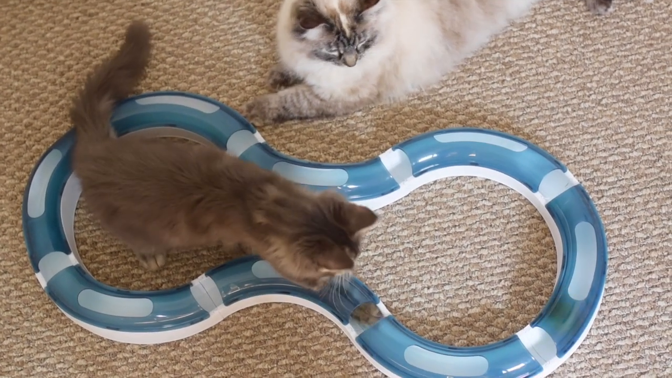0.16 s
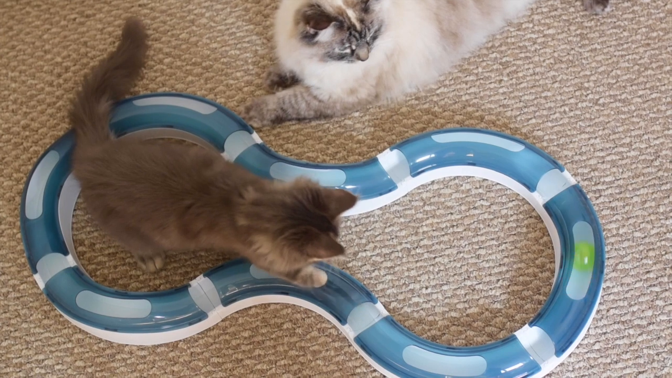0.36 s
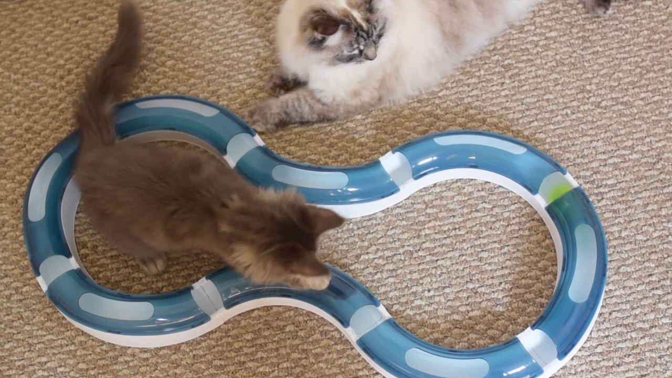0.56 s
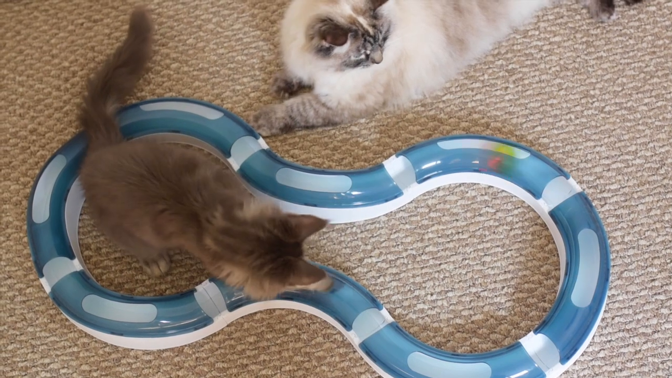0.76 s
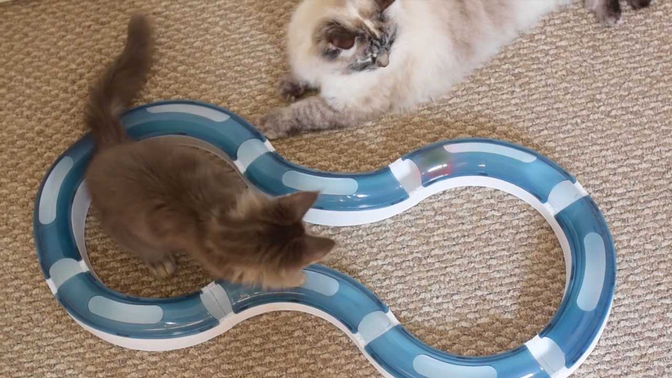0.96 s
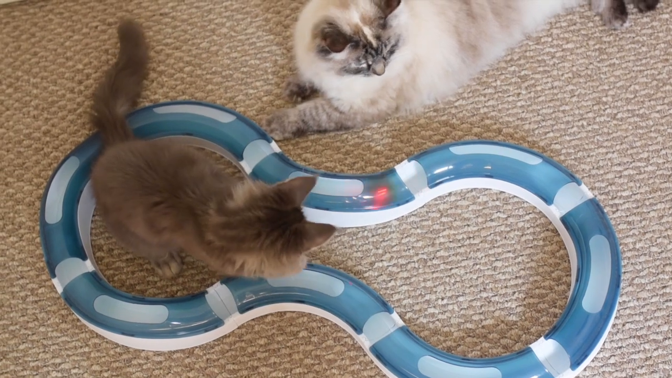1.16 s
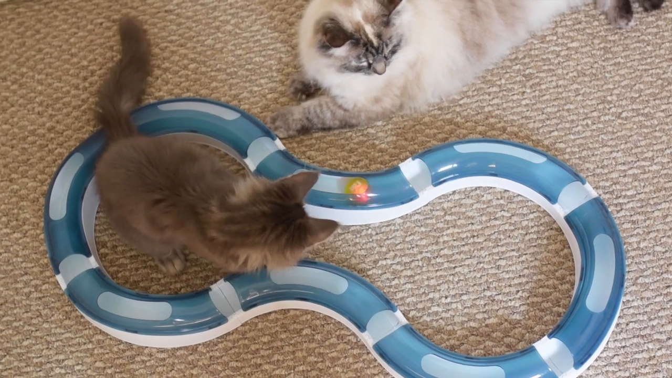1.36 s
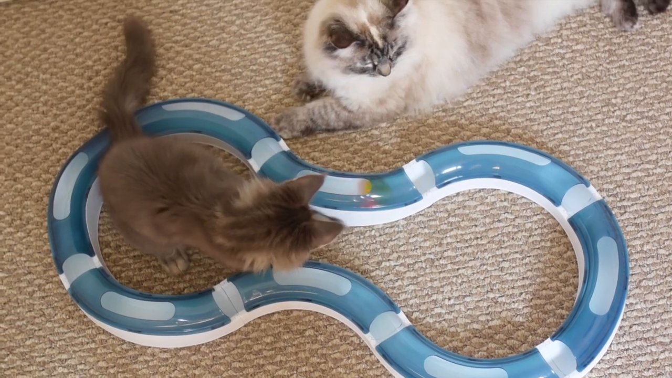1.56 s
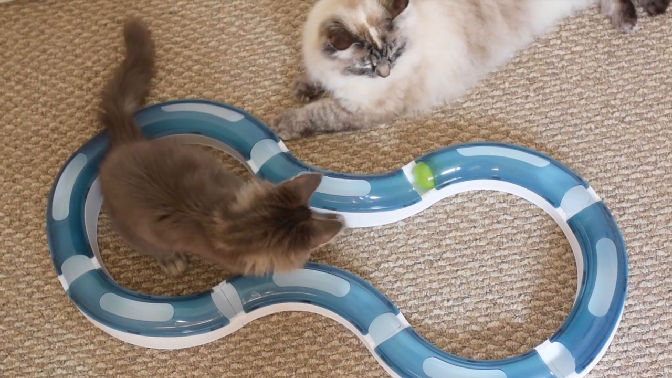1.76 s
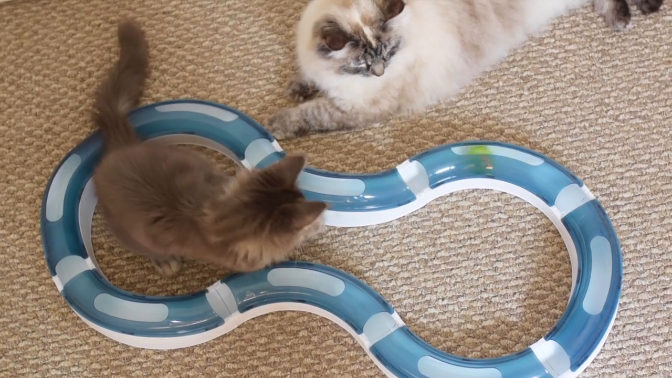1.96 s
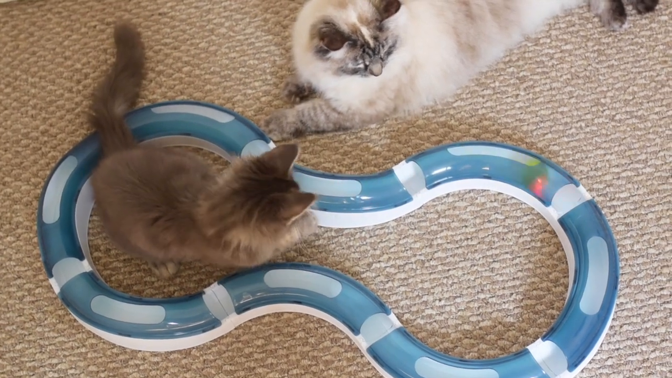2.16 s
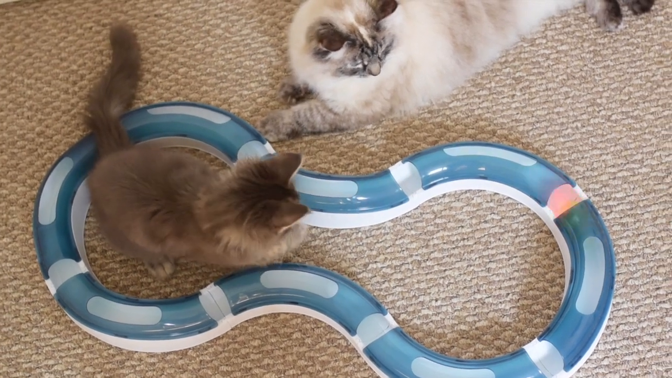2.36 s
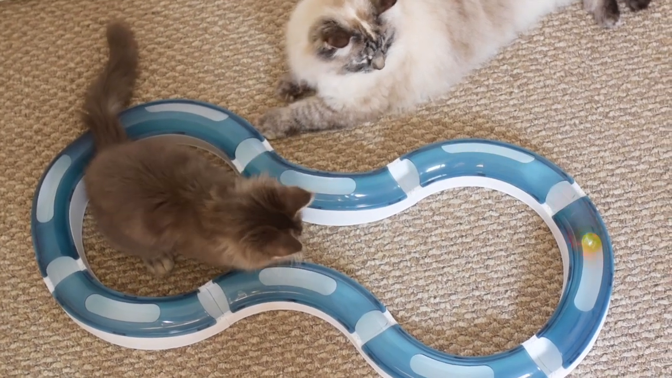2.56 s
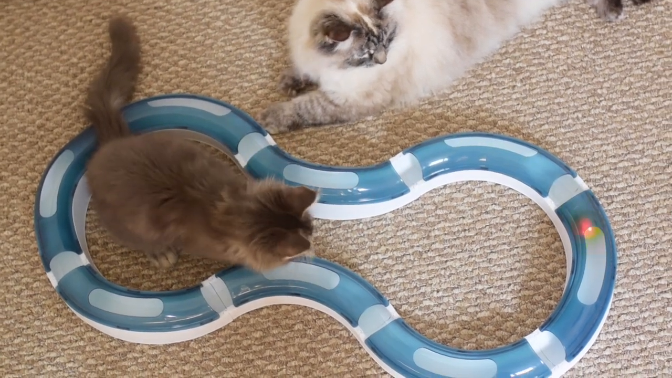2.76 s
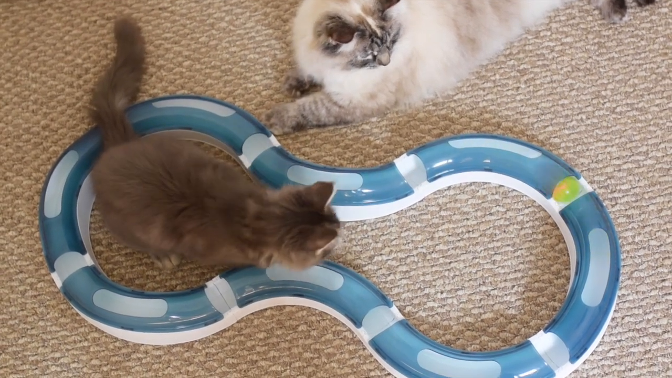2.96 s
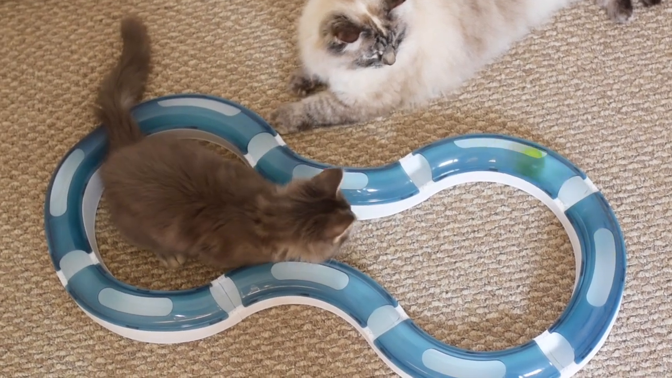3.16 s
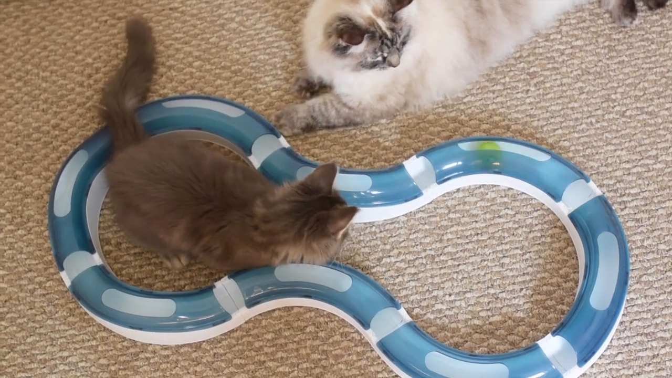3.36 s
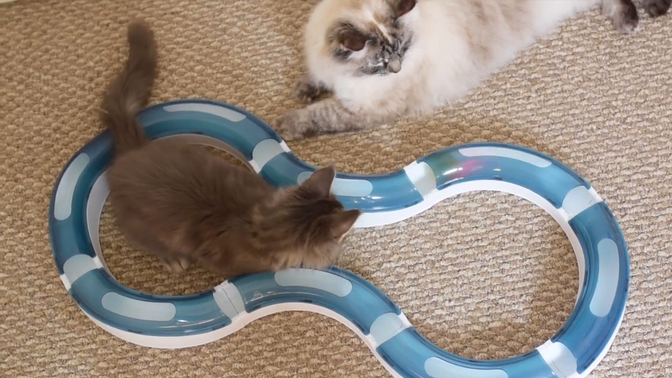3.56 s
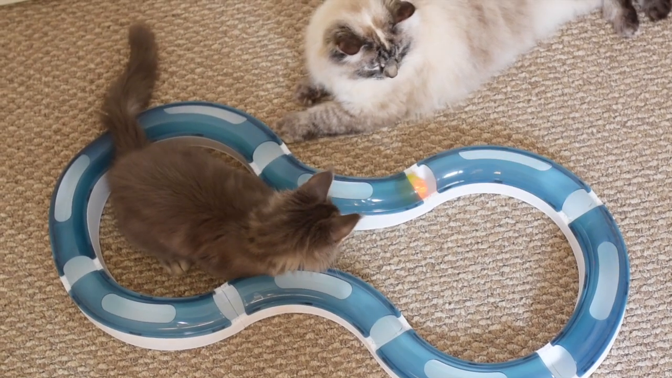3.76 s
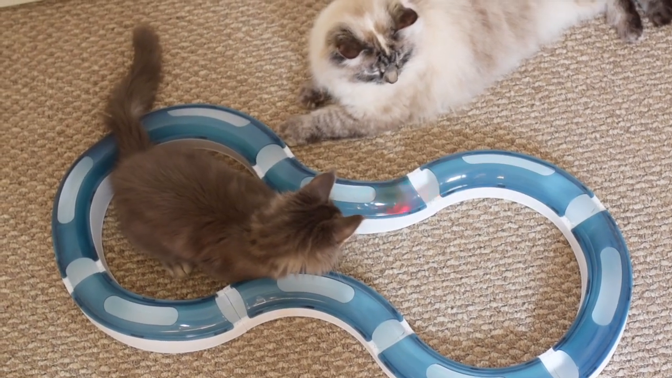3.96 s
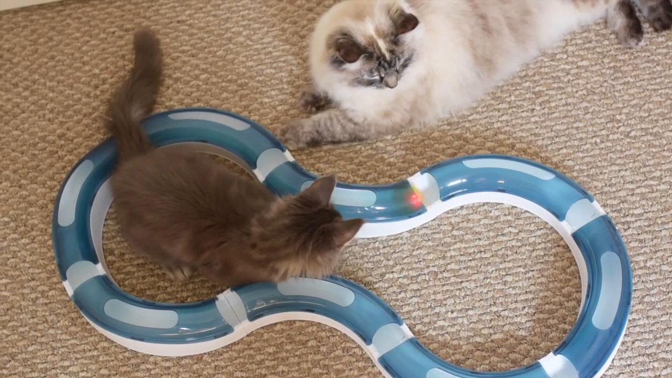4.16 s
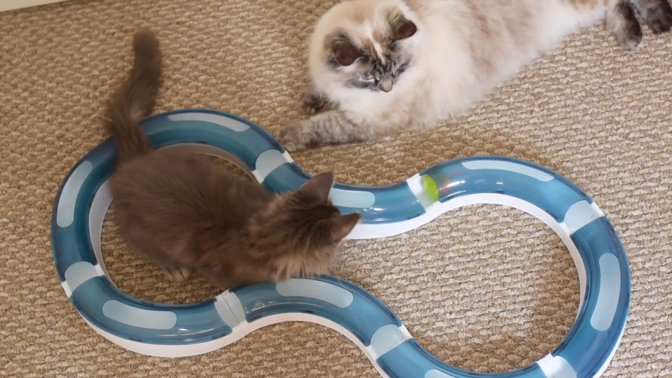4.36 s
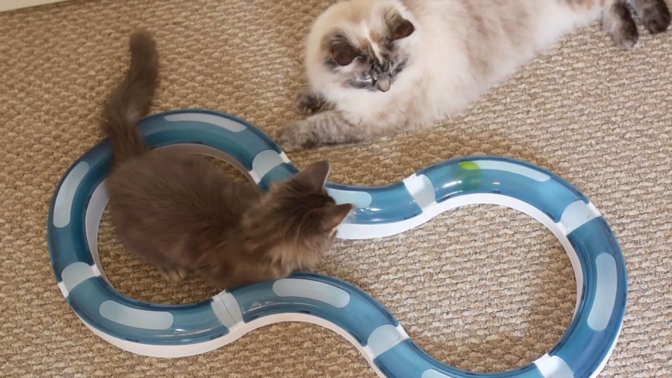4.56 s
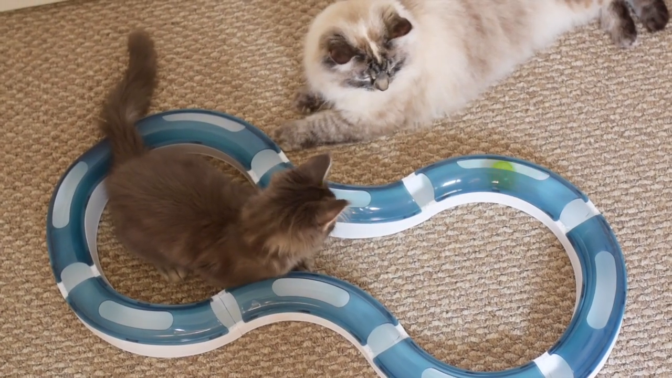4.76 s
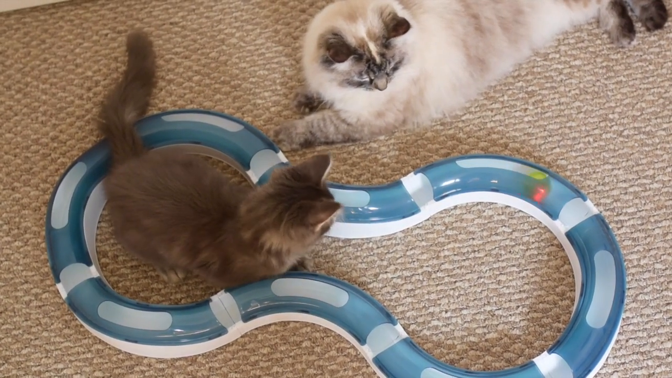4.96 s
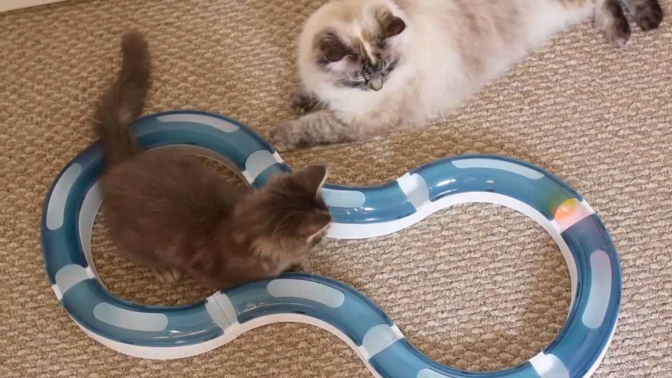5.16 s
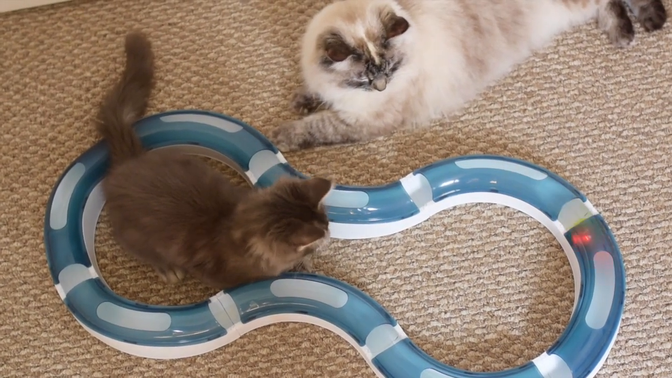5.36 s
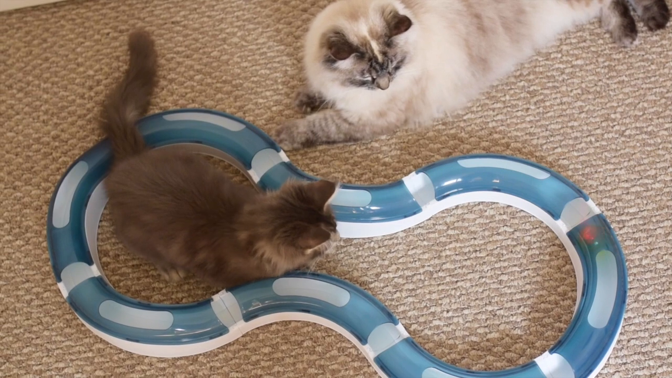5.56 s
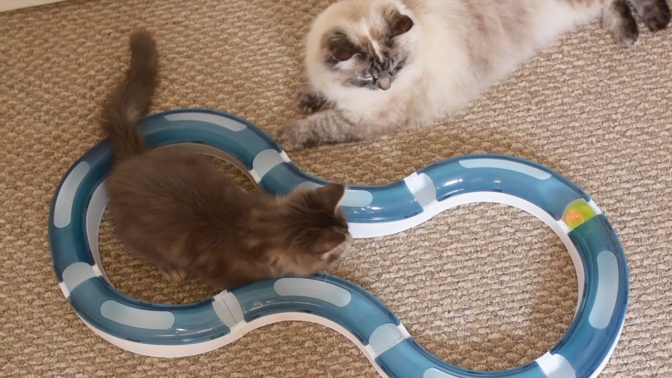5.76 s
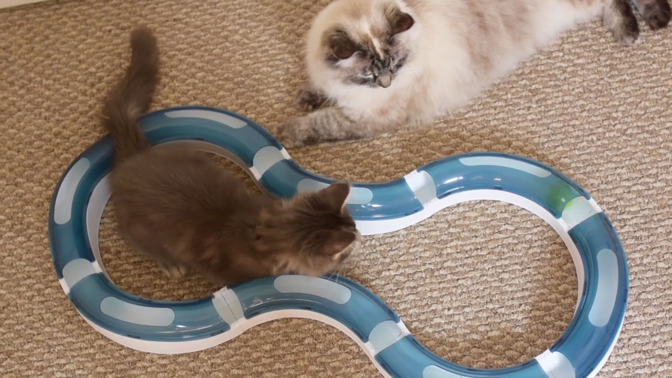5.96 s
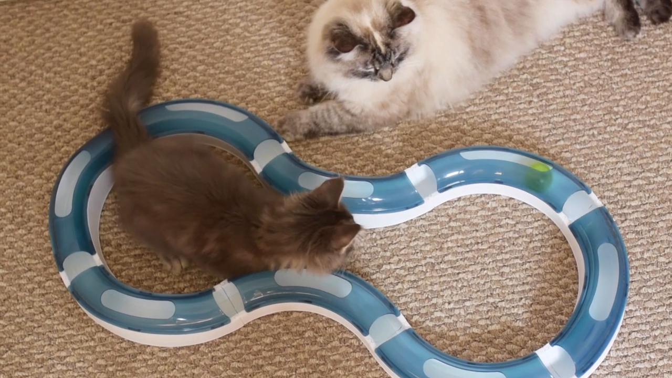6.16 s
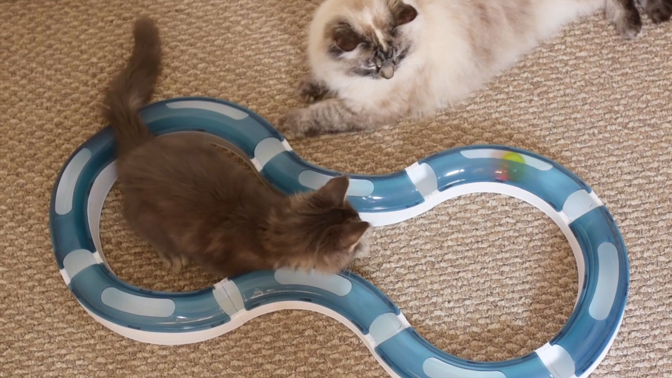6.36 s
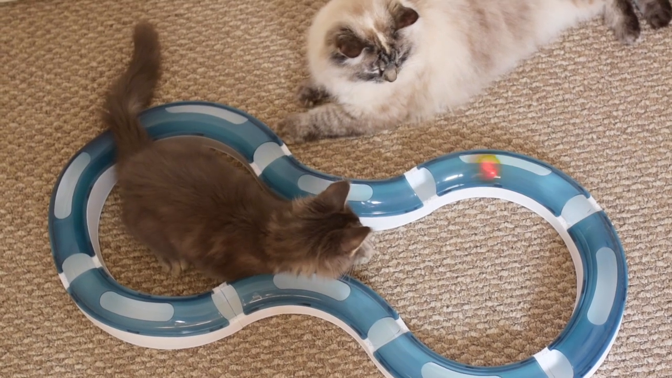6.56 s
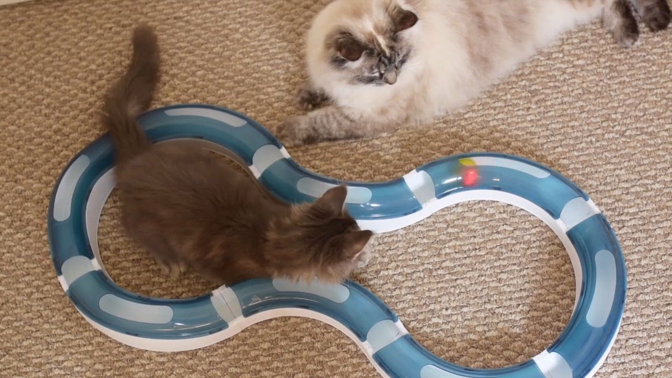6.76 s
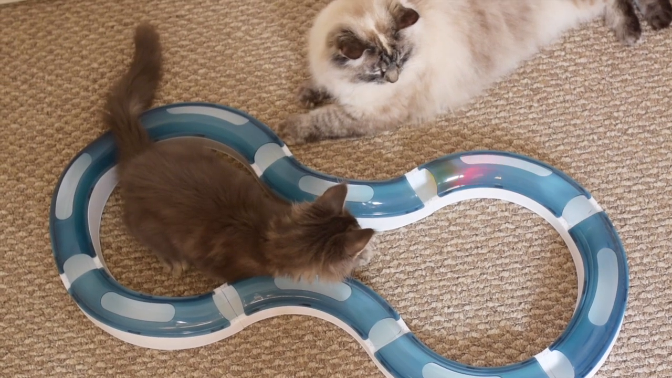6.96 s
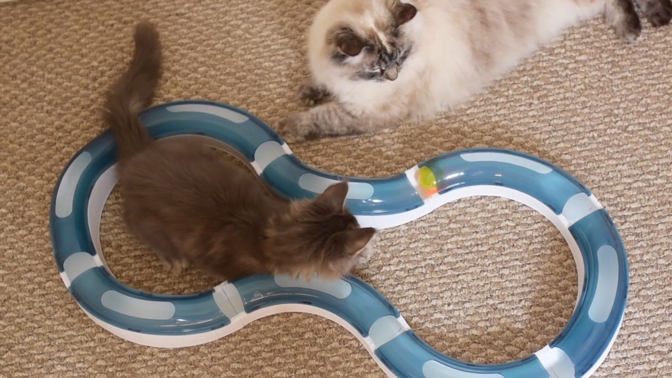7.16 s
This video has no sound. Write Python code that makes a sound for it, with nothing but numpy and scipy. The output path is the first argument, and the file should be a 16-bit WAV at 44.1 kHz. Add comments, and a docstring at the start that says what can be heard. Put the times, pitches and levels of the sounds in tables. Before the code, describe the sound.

A hollow plastic ball whirrs through a tube track after a bright paw scratch, then rattles to and fro with knocks and joint clacks, growing steadily quieter.

```python
"""A bright paw scratch and quick knocks come first, then the whirr of a hollow plastic ball in a bend.
A kitten has batted the ball round a plastic tube track on a carpet. It rocks to and fro ever more
quietly, knocking on its seam and rattling over the joints. Short bursts of noise make the knocks,
streams of tiny impacts make the rolling, whirr and scrapes, and filters give them the colour of
plastic. A small dry tick comes late; a quiet living room rings a little under a steady hush."""
import sys
import numpy as np
from scipy import signal
from scipy.fft import rfft, irfft, next_fast_len
from scipy.io import wavfile

SR = 44100
rng = np.random.default_rng(int(sys.argv[2]) if len(sys.argv) > 2 else 0)


def to_wav(sig):
    """Store sig (one row per channel, or 1-D mono) as 16-bit WAV at the path in sys.argv[1].

    Samples outside -1..1 are clipped; the rate is SR.
    """
    pcm = np.clip(np.atleast_2d(sig), -1, 1) * 32767
    pcm = np.round(pcm).astype(np.int16)
    wavfile.write(sys.argv[1], SR, pcm.T)  # frames by channels


N = 318843


def from_db(db):
    """Turn decibels into a gain."""
    return 10 ** (np.asarray(db) / 20)


def rms_one(x):
    """Scale a sound to an rms (average strength) of 1."""
    return x / np.sqrt(np.mean(x ** 2) + 1e-20)


def add(out, s, sound):
    """Mix a sound in at time s, in seconds."""
    start = max(0, round(s * SR))
    out[start:start + len(sound)] += sound[:N - start]


def colour(x, *spectra):
    """Filter without pre-echo (minimum phase); the response in dB is the sum of the spectra."""
    size = 2 * next_fast_len(len(x))
    log_hz = np.log(np.maximum(np.arange(size // 2 + 1) * SR / size, 1))
    db = 0
    for spectrum in spectra:
        hz, level_db = np.transpose(spectrum)
        db = db + np.interp(log_hz, np.log(hz), level_db)
    # folding the cepstrum onto positive times gives the minimum phase
    cepstrum = irfft(np.log(from_db(db)))[:size // 2]
    cepstrum[1:] *= 2
    return irfft(rfft(x, size) * np.exp(rfft(cepstrum, size)))[:len(x)]


def resonate(x, modes):
    """Resonances side by side; the dB of each is its gain at its own pitch."""
    out = np.zeros(len(x))
    for hz, width_hz, db in modes:
        r = np.exp(-np.pi * width_hz / SR)
        feedback = [1, -2 * r * np.cos(2 * np.pi * hz / SR), r * r]
        ringing = signal.lfilter([1, 0, -1], feedback, x + 1e-18)
        out += from_db(db) * (1 - r * r) / 2 * ringing
    return out


def contacts(per_s, spread_db, size):
    """Tiny impacts at random moments, of uneven strength and either sign."""
    strength = from_db(spread_db * np.minimum(rng.exponential(1, size), 4))
    happens = rng.random(size) < per_s / SR
    return happens * strength * rng.choice([-1, 1], size)


# Broad colour of the hollow shell. Each row: frequency in Hz, filter level in dB.
SHELL_COLOUR = [(50, -40), (110, -35), (160, -22.5), (300, -16), (450, -5.5), (600, -1.5), (800, -2.5),
                (1300, 4), (2100, -1), (2900, -7.5), (4000, -15.5), (6500, -23.5), (10000, -24.5),
                (15500, -44)]


def knock(thud_db, hardness_db, crack_db, rebound_db, shell_t60=0.026, rebound_t60=0.13,
          rebound_delay_s=.009, usual_thud_db=-22, usual_hardness_db=-8.0, usual_crack_db=-26):
    """One blow: the dense modes of the shell die fast, and the ball chatters on in small rebounds."""
    t = np.arange(SR // 6) / SR
    # a soft blow is more of a thud; a hard one is shorter, so it reaches higher modes
    contact = [(450, thud_db - usual_thud_db), (1000, 0),
               (2300, hardness_db - usual_hardness_db), (7000, crack_db - usual_crack_db)]
    # a hard blow also builds up sooner
    build_s = .0035 * from_db(-.25 * hardness_db)
    build = np.minimum(t / build_s, 1)
    burst = rng.standard_normal(len(t)) * build * from_db(-60 * t / shell_t60)
    blow = colour(burst, SHELL_COLOUR, contact)
    chatter = contacts(450, 1.14, len(t)) * from_db(-60 * t / rebound_t60) * (t > rebound_delay_s)
    chatter = colour(chatter, SHELL_COLOUR, contact, [(2500, 2.9), (8000, 2.6)])
    return rms_one(blow) + from_db(rebound_db) * rms_one(chatter)


def thud_share(strength_db, usual_strength_db=-28, usual_thud_db=-21, follows=-0.37):
    """Gentle blows are mostly thud: the bass share, in dB, falls as blows get stronger."""
    return usual_thud_db + follows * (strength_db - usual_strength_db)


# The ball clacks onto a joint and drops off its far edge. Each row: time of the clack in seconds,
# strength in dB, crack (treble share) in dB, catch on the lip in dB, seconds until the drop,
# drop in dB, hardness (upper-mid share) of the drop in dB, ring of the joint in dB.
# All levels are relative: they are scaled further on.
JOINT_CROSSINGS = [(0.654, -12.5, -31.5, -20.5, .073, -6, -11.5, -18),
                   (1.153, -18, -30.5, -34, .036, -0.5, -21.5, -2),
                   (1.785, -23.5, -37.5, -11.5, 0.054, -2, -14, 4),
                   (2.414, -21, -31, -9, 0.057, -3, -18, -9), (2.991, -20.5, -33.5, -15, .051, -1, -9, -12),
                   (3.807, -25, -30.5, -25, .043, 0.5, -16.5, 1.5),
                   (5.364, -21.5, -28, -18.5, 0.077, -10.5, -18, -30),
                   (5.812, -23.5, -40, -28, 0.085, -9, -19.5, -20)]


def joints(level_db=-23.0, hardness_db=-12.0, rebound_db=-5.5, lip_s=0.013, lip_crack_db=-52.0,
           lip_rebound_db=5.0, drop_crack_db=-6.5, drop_rebound_db=0.0, drop_level_db=-25.0,
           ring_hz=3290, ring_width_hz=500):
    """The ball catches the lip of a loose joint, clacks onto it, and drops off with a rattle."""
    out = np.zeros(N)
    for s, strength_db, crack_db, lip_db, cross_s, drop_db, drop_hardness_db, ring_db in JOINT_CROSSINGS:
        thud_db = thud_share(strength_db)
        lip = knock(thud_db, hardness_db, lip_crack_db, lip_rebound_db)
        clack = knock(thud_db, hardness_db, crack_db, rebound_db)
        drop = knock(thud_share(strength_db + drop_db), drop_hardness_db,
                     crack_db + drop_crack_db, drop_rebound_db)
        blows = [(s - lip_s, lip_db + level_db, lip),
                 (s, level_db, clack),
                 (s + cross_s, drop_db + drop_level_db, drop)]
        for at, blow_db, blow in blows:
            ringing = resonate(blow, [(ring_hz, ring_width_hz, ring_db)])
            add(out, at, from_db(strength_db + blow_db) * (blow + ringing))
    return out


# The rolling ball bumps on its seam. Each row: time in seconds, strength in dB, hardness (upper-mid
# share) in dB, rebounds in dB, soft scuff before the knock in dB. All levels are relative.
SEAM_BUMPS = [(0.002, -18, -7.5, -5, -12), (0.046, -24, -18, -4, -6), (0.14, -27, -7, -1, -7),
              (0.176, -28, -11, 4, -16), (0.237, -23, -18, -11, -20), (0.288, -23.5, -18, -14, -10.5),
              (0.433, -21.5, -17, -14, -21), (0.508, -29, -20, -8, -24), (0.546, -32, -10, -2, -25),
              (0.622, -23.5, -12.5, -10, -10.5), (0.832, -20.5, -9.5, -9, -12), (0.887, -20, -14, -10, -17),
              (0.912, -23, -13.5, -4, -20), (0.979, -23.5, -5, -9.5, -13), (1.006, -20.5, -12.5, -8.5, -17),
              (1.078, -26.5, -12.5, 0, -5), (1.669, -29, -16.5, -14, -16), (1.886, -25.5, -8, -4, -24),
              (1.986, -27.5, -14.5, -0.5, -11), (2.012, -25.5, -17, -2.5, -21),
              (2.117, -24.5, -10.5, -0.5, -20), (2.218, -25.5, -10.5, -1, -15),
              (2.248, -25.5, -13, -12, -17), (2.355, -28.5, -12, -4.5, -26), (2.94, -30.5, -13, 2.5, -9),
              (3.21, -29, -13.5, -0.5, -5), (3.345, -32.5, -17.5, 3.5, -1), (3.52, -26, -16.5, -8, -9),
              (3.646, -32.5, -15, -1.5, -24), (4.289, -32, -19, -8, -6.5), (4.504, -32, -13, -10, -7),
              (4.657, -31, -14.5, 0.5, -11), (4.892, -27.5, -17.5, -5.5, -9.5), (5.04, -35, -15, 3, -10),
              (5.268, -35, -16.5, 3.5, -34), (5.733, -32, -13, -3, -11.5), (6.218, -33, -15, -10, -18),
              (6.416, -39, -18, 4, -10), (6.791, -33.5, -19.5, -14, -14), (7.038, -39, -16, -4.5, -27)]


def bumps(level_db=-23.0, crack_db=-31.0, crack_follows=0.63, soft_rebound_db=4.0,
          soft_level_db=-23.5, soft_lead_s=.022):
    """A soft chattering scuff, then the knock; harder knocks also crack more."""
    out = np.zeros(N)
    for s, strength_db, hardness_db, rebound_db, soft_db in SEAM_BUMPS:
        tone = thud_share(strength_db), hardness_db, crack_db + crack_follows * hardness_db
        soft_gain = from_db(strength_db + soft_db + soft_level_db)
        add(out, s - soft_lead_s, soft_gain * knock(*tone, soft_rebound_db))
        add(out, s, from_db(strength_db + level_db) * knock(*tone, rebound_db))
    return out


def bump_swing(before_s=0.047, before_db=-0.5, after_s=0.029, after_db=1.0):
    """Change in dB: the rolling is a little softer just before each bump and louder just after."""
    t = np.arange(0, N, 100) / SR
    age = t - np.array(SEAM_BUMPS)[:, :1]
    before = before_db * np.exp(-(age / before_s + 1) ** 2 * 2)
    after = after_db * np.exp(-(age / after_s - 1) ** 2 * 2)
    return np.interp(np.arange(N) / SR, t, (before + after).sum(axis=0))


# The ball rolls one way, then turns back. Each row: start in seconds, stop in seconds,
# relative rumble midway in dB, change in dB per second.
ROLLS_TO_AND_FRO = [(-0.2, 1.442, -42.5, 1), (1.6, 2.69, -46, -3.5), (2.79, 4.05, -49.5, 0.5),
                    (4.13, 5.5, -53, -3), (5.64, 6.64, -58.5, 9), (6.7, 7.35, -65, -2)]


def roll_level(speed_up_s=0.1, slow_down_s=0.23):
    """Rumble in dB: each roll gathers speed, coasts, and slows to a stop."""
    t, gain = np.arange(N) / SR, 1e-5
    for start, stop, db, db_per_s in ROLLS_TO_AND_FRO:
        speed = np.clip((t - start) / speed_up_s, 0, 1) * np.clip((stop - t) / slow_down_s, 0, 1)
        middle = (start + stop) / 2
        gain = gain + speed ** 1.38 * from_db(db + db_per_s * (t - middle))
    return 20 * np.log10(gain)


def bend_hush(middle_s=0.42, width_s=.09, depth_db=15.0):
    """Change in dB: held to the wall in the fast bend, the ball rattles less."""
    return -depth_db * np.exp(-((np.arange(N) / SR - middle_s) / width_s) ** 2)


# Colours of the low thudding, the middle rumble and the gritty scratching of the rolling ball.
# Each row: frequency in Hz, filter level in dB.
THUD_COLOUR = [(50, -27), (110, -28.5), (160, -8.5), (300, -0.5), (450, 0.5), (650, -2), (1200, -7),
               (5000, -78)]
RUMBLE_COLOUR = [(200, -47), (450, -6), (650, 0.5), (800, -1), (1300, 1.5), (1700, -5), (2400, -16),
                 (5000, -47), (15000, -79)]
GRIT_COLOUR = [(300, -27), (1100, 6.5), (1700, -1.5), (2350, 4), (2900, -8), (4000, -10), (6500, -20.5),
               (10500, -35), (12000, -35), (13000, -38), (15500, -49)]


def rolling(rumble_db=-5.0, grit_db=-10.5, thud_db=-35.0, thud_growth=0.55, contacts_per_s=600,
            spread_db=1.5, grit_follows=1.24, usual_rumble_db=-44):
    """The ball's seam and the roughness of the tube make a stream of tiny impacts."""
    rumble = roll_level() + bend_hush() + bump_swing()
    # grit rises and falls by more dB than the rumble does
    grit = usual_rumble_db + grit_follows * (rumble - usual_rumble_db)
    taps = contacts(contacts_per_s, spread_db, N)
    # the low thudding comes from the ball's weight and grows less with speed
    low = from_db(thud_growth * rumble + thud_db) * rms_one(colour(taps, THUD_COLOUR))
    # the same impacts reach the middle and upper modes, each with a sign or strength of its own
    middle_taps = taps * rng.choice([-1, 1], N)
    middle = from_db(rumble + rumble_db) * rms_one(colour(middle_taps, RUMBLE_COLOUR))
    scratches = taps * rng.uniform(-1.5, 1.5, N) + contacts(1500, 2.5, N)
    high = from_db(grit + grit_db) * rms_one(colour(scratches, GRIT_COLOUR))
    return low + middle + high


# The ball pressed to the outer wall of the first bend. Each row: time in seconds, relative whirr in dB.
BEND_WHIRR = [(0, -29), (.06, -52), (.17, -46), (.24, -35.5), (.3, -36.5), (.36, -48.5), (.45, -40.5),
              (.7, -45.5), (.9, -97)]
# Resonances driven in the bend. Each row: frequency in Hz, width in Hz, gain in dB.
BEND_RESONANCES = [(546, 14, 9), (546, 19, -18), (700, 20, 5), (782, 21, 9), (866, 22, 3), (855, 11, -14.5),
                   (921, 39, 7), (1030, 81, 0), (1140, 26, -11), (1240, 7.3, -22)]


def whirr():
    """At speed the ball hugs the outer wall and keeps that bend ringing."""
    drive_colour = [(200, -49), (500, -1.5), (1200, 5.0), (3000, -27), (8000, -10)]
    drive = colour(contacts(2500, 1.0, N), drive_colour)
    level_db = np.interp(np.arange(N) / SR, *np.transpose(BEND_WHIRR))
    return from_db(level_db) * rms_one(resonate(drive, BEND_RESONANCES))


# Scrapes on the plastic: paw strokes, and near 1.8 s probably the ball at a joint.
# Each row: start in seconds, relative level in dB, seconds to fade by 60 dB.
SCRAPES = [(0.019, -39.5, 0.28), (0.055, -46, 0.34), (0.134, -41.5, 0.07), (0.178, -53, 0.9),
           (1.629, -56.5, 0.5), (1.765, -49, 0.33), (1.835, -53, 0.1)]
# Colour of the scrapes without the claws. Each row: frequency in Hz, filter level in dB.
SCRAPE_COLOUR = [(400, -41), (1500, 1), (2400, 15), (2900, 12.5), (3500, 5), (4200, 5), (4650, 7),
                 (5400, 1.5), (7000, -3), (10500, -7), (15500, -31)]


def scrapes(claw_db=-8.5, claw_s=0.11, attack_s=0.0047):
    """Something slips over the plastic in fine catches; each scrape starts fast and fades."""
    t, strokes = np.arange(N) / SR, 0
    for s, db, fade_s in SCRAPES:
        age = np.maximum(t - s, 0)
        strokes = strokes + np.minimum(age / attack_s, 1) * from_db(db - 60 * age / fade_s)
    claw_colour = [(2000, -11), (3500, 7), (4700, -1), (6500, 0), (11000, -1), (15500, -15)]
    claws = rms_one(colour(contacts(1800, 1.6, N), claw_colour))
    slips = rms_one(colour(contacts(1800, 1.6, N), SCRAPE_COLOUR))
    # the claws fade from the start, so the first swipe of the paw scratches brightly
    return strokes * (slips + from_db(claw_db) * np.exp(-t / claw_s) * claws)


# Resonances (+) and dead spots (-) of the track. Each row: frequency in Hz, width in Hz,
# nominal lift or dip in dB against its broad response.
TRACK_RESONANCES = [(150.3, 11, 11), (230, 13, 2.5), (432, 22, 6), (518, 40, -10.5), (528, 15, 6.5),
                    (595, 69, -9.5), (708, 51, 3.5), (770.7, 16.3, 4.5), (831, 39, 8.5), (856, 9.5, 3.5),
                    (940, 24, -1.5), (1004, 22, 1.5), (1111, 11, 4), (1275, 35, 3.5), (1582, 87, 2.5),
                    (1742, 7.6, 7), (1770, 30, 3), (2193, 123, 3.5), (2407, 126, 4), (2640, 78, 0.5),
                    (2770, 32, 3), (3050, 53, 4.5), (3314, 106, 3), (4630, 240, 3), (11960, 110, 11.5)]


def track(x, count=40):
    """Each resonance of the tube lifts, and each dead spot dips, its own narrow band."""
    for hz, width_hz, db in TRACK_RESONANCES:
        # the ball drives a mode more or less strongly as it passes its nodes and bellies:
        # a random strength that drifts
        strengths = rng.uniform(.4, 1.4, count)
        coupling = np.interp(np.arange(N), np.linspace(0, N, count), strengths)
        x = x + (from_db(db) - 1) * resonate(x * coupling, [(hz, width_hz, 0)])
    return x


# One small dry tick: time in seconds, peak level in dB before the final treble cut.
DRY_TICK = (6.2815, -38.5)
# What the tick rings with. Each row: frequency in Hz, width in Hz, gain in dB.
TICK_RESONANCES = [(2400, 500, -8), (3250, 280, 1), (4400, 400, -2)]


def tick():
    """A short, thin tick with no tail after it: a tiny burst of noise through a few resonances."""
    s, db = DRY_TICK
    t, out = np.arange(SR // 20) / SR, np.zeros(N)
    burst = rng.standard_normal(len(t)) * from_db(-60 * t / .007)
    snap = resonate(burst, TICK_RESONANCES)
    snap = colour(snap, [(1200, -22), (2400, 10), (4800, -1), (6500, -26)])
    add(out, s, from_db(db) * snap / np.abs(snap).max())
    return out


# How long the room rings. Each row: frequency in Hz, seconds to fade by 60 dB.
ROOM_FADE = [(150, 0.45), (1000, 0.33), (3000, 0.2), (8000, 0.24), (15000, 0.1)]


def room_tail(first_echo_s=0.0067):
    """Diffuse echoes in bands about an octave wide, each with its own fade time; total energy 1."""
    t, tail = np.arange(SR // 2) / SR, 0
    edges = np.geomspace(70, 17000, 9)
    for low, high in zip(edges, edges[1:]):
        t60 = np.interp(np.sqrt(low * high), *np.transpose(ROOM_FADE))
        band = signal.butter(2, [low, high], "band", fs=SR, output="sos")
        noise = signal.sosfilt(band, rng.standard_normal(len(t)))
        tail = tail + noise * from_db(-60 * t / t60)
    # silent until the first echo, then swelling to full over the same time again
    tail = tail * np.clip(t / first_echo_s - 1, 0, 1)
    return tail / np.sqrt(np.sum(tail ** 2))


def room(x, count=36):
    """The echo pattern changes as the ball moves: each stretch has its own, fading into the next."""
    step = N // count + 1
    padded = np.pad(x, (step, 2 * step))
    fade = np.sin(np.linspace(0, np.pi, 2 * step))  # overlapping halves keep the power even
    out = np.zeros(len(padded) + SR)
    for start in range(0, N + step, step):
        stretch = padded[start:start + 2 * step] * fade
        echoes = signal.fftconvolve(stretch, room_tail())
        out[start:start + len(echoes)] += echoes
    return out[step:step + N]


# Colour of the room's hush. Each row: frequency in Hz, filter level in dB.
AIR_COLOUR = [(25, -24), (42, -35), (60, 0), (80, -17), (110, -4), (150, 1.5), (200, 2.5), (300, 1),
              (800, 1), (1700, -1), (2600, -5.5), (4000, -9), (10000, -19.5), (15500, -30.5)]


def hush(level_db=-60.5):
    """The quiet room: steady noise, shaped by a filter."""
    return from_db(level_db) * rms_one(colour(rng.standard_normal(N), AIR_COLOUR))


def scene(room_db=-7.0, toy_db=-2.0):
    """Ball and paw excite the track, which sounds into the room over a steady hush."""
    excitation = joints() + bumps() + rolling() + scrapes()
    toy = from_db(toy_db) * (track(excitation) + whirr())
    return (toy + from_db(room_db) * room(toy) + tick() + hush())[None]


def record(dry, cutoff_hz=15750):
    """A steep filter cuts off the very top of the treble."""
    steep = signal.ellip(12, .1, 80, cutoff_hz, fs=SR, output="sos")
    return signal.sosfilt(steep, dry)


dry = scene()
out = record(dry)
to_wav(out)
```